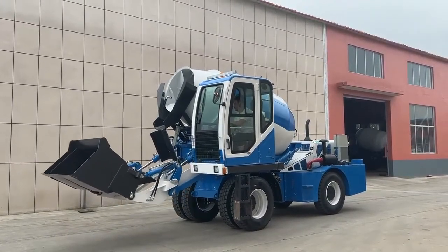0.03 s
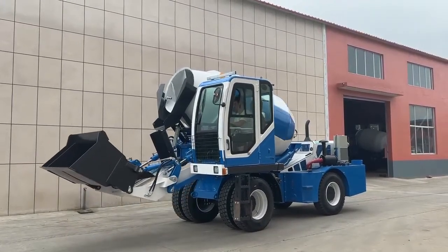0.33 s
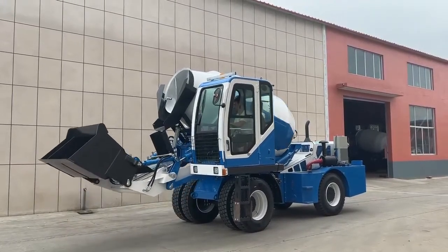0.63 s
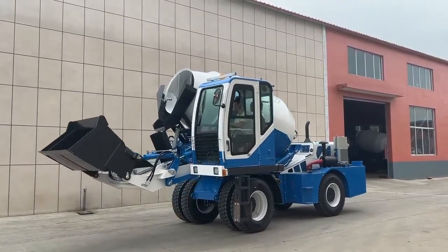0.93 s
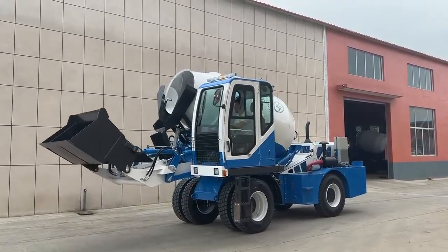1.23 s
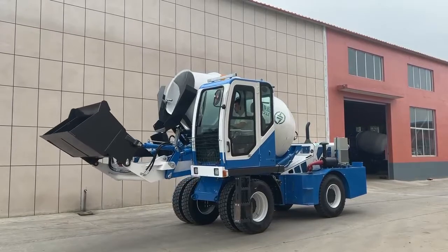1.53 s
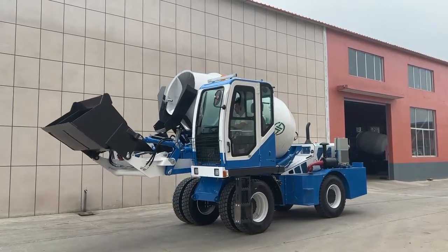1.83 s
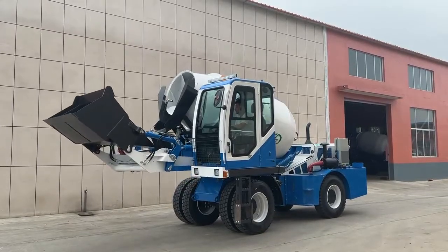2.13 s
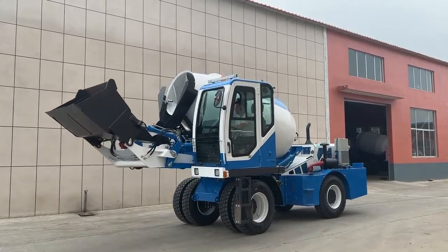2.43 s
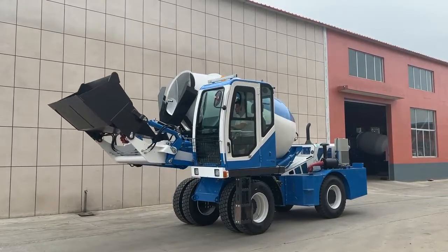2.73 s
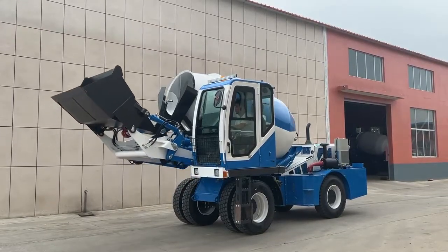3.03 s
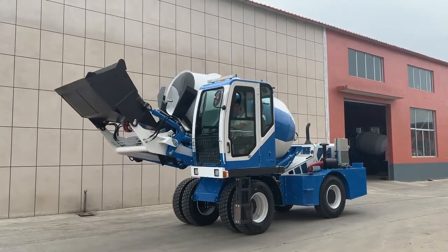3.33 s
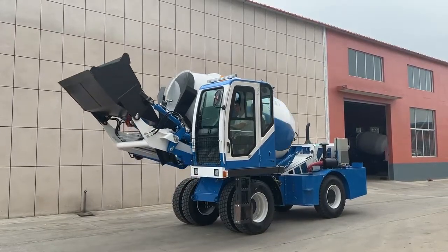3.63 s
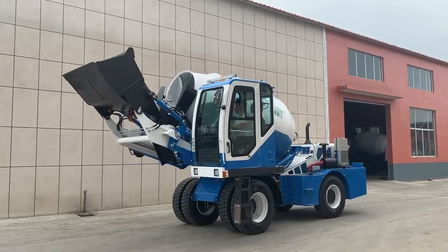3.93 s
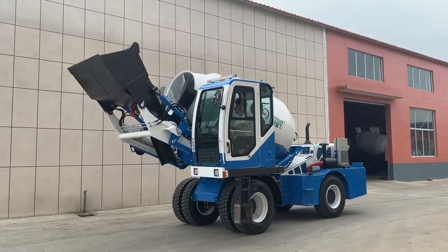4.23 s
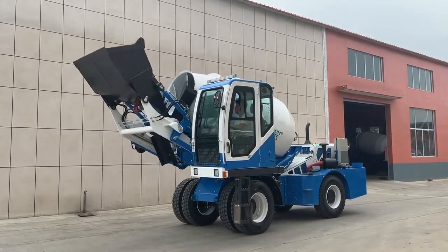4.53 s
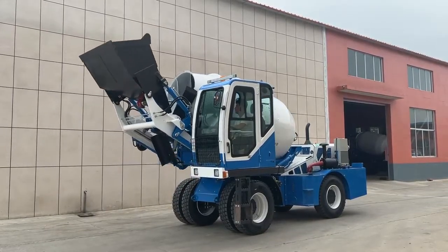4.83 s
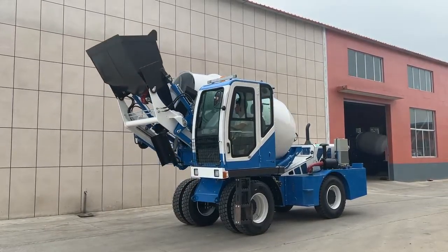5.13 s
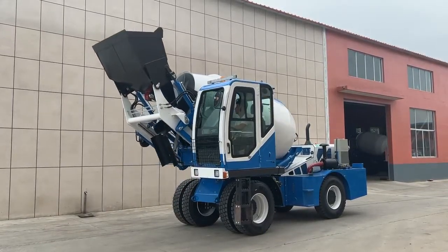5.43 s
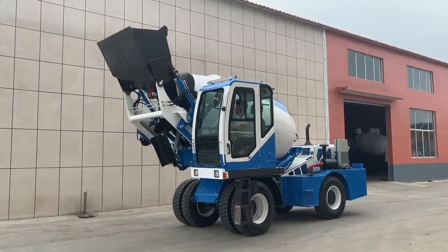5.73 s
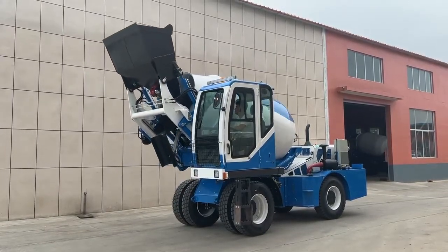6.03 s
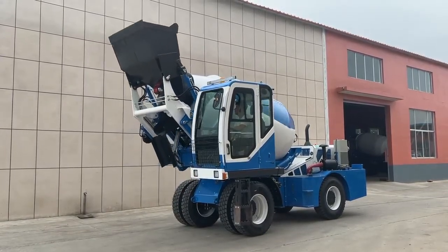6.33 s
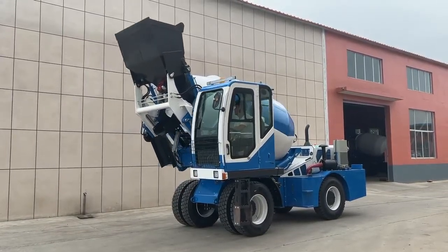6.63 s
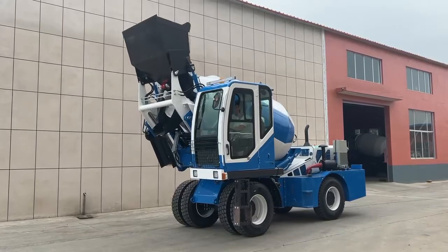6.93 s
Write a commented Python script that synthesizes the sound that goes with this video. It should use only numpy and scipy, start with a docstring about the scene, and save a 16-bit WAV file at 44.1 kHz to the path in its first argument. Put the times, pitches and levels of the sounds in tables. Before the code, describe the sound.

A concrete mixer vehicle's diesel engine runs loudly at working speed, knocking, whining and rumbling. At first a hydraulic pump hums under a buzzing hiss, then oil hisses through the valves in several surges as the bucket rises, with a few soft, dull thumps. After about five seconds the engine sinks to a slower, throbbing idle while the hiss continues. It is heard in stereo in an open paved yard.

```python
"""A self-loading concrete mixer raises its bucket in a paved yard, heard in stereo.
Its four-cylinder diesel knocks, whines and rumbles at working speed, then sinks to idle after five
seconds. Oil hisses through the valves; at first the pump hums and chops that hiss. The whole mixer
is heard directly and as a diffuse, slightly later wash that widens the stereo."""
import sys
import numpy as np
from scipy import signal
from scipy.fft import rfft, irfft
from scipy.io import wavfile

SR = 44100
rng = np.random.default_rng(int(sys.argv[2]) if len(sys.argv) > 2 else 0)


def master_out(mix):
    """Clip the mix to full scale and print it as 16-bit PCM to the path in sys.argv[1]."""
    frames = np.transpose(np.atleast_2d(mix))
    ceiling = np.clip(frames, -1, 1)
    pcm = np.round(ceiling * 32767).astype(np.int16)
    wavfile.write(sys.argv[1], SR, pcm)


N = 317079
TIME = np.arange(N) / SR
FREQS = np.fft.rfftfreq(N, 1 / SR)

# resonances of the engine block: pitch_hz, width_hz, level_db
BLOCK_MODES = [(760, 53, 7), (814, 49, -1), (867, 37, -0.5), (1046, 62, -9.5)]
# surges of oil to the bucket: start_s, rise_s, fall_s, hiss_db, jet_db
OIL_SURGES = [(1.0, 0.63, 0.45, 1, -4), (1.85, 0.44, 0.45, 2, 10.5), (2.92, 0.32, 0.38, 2.5, 10),
              (3.6, 0.27, 0.37, 1, 6), (4.15, 0.26, 0.41, .5, 8), (6.0, 0.2, 0.32, -0.5, 5.5)]


def gain_of(db):
    """Decibels to amplitude."""
    return 10 ** (np.asarray(db) / 20)

def unit_rms(x):
    """Scales x to rms 1."""
    return x / np.sqrt(np.mean(x ** 2) + 1e-20)

def over_time(rows):
    """Each column of a time table, at every sample."""
    time_s, *columns = np.transpose(rows)
    return [np.interp(TIME, time_s, column) for column in columns]

def over_frequency(points):
    """A frequency table on a log axis, at every bin."""
    hz, value = np.transpose(points)
    return np.interp(np.log(FREQS + 1), np.log(hz + 1), value)

def coloured(x, spectrum):
    """Gives x a broad colour, at rms 1."""
    return unit_rms(irfft(rfft(x) * gain_of(over_frequency(spectrum)), N))

def ring(x, modes):
    """Passes x through causal resonances whose powers add, at rms 1."""
    power = sum(gain_of(db) ** 2 / (1 + ((FREQS ** 2 - hz ** 2) / (width * FREQS + 1e-6)) ** 2)
                for hz, width, db in modes)
    cepstrum = irfft(.5 * np.log(power + 1e-10), N)
    minimum_phase = np.exp(rfft(2 * cepstrum[:N // 2], N))
    return unit_rms(irfft(rfft(x) * minimum_phase, N))

def drift(hz, size=16384):
    """A random wander of rms 1, up to about hz."""
    step_s = N / SR / size
    lowpass = np.exp(-(np.fft.rfftfreq(size, step_s) / hz) ** 2)
    slow = irfft(rfft(rng.standard_normal(size)) * lowpass)
    return np.interp(TIME, np.arange(size) * step_s, unit_rms(slow))

def swell(start_s, rise_s, hold_s, fall_s):
    """A smooth 0-1 envelope."""
    ramp = np.minimum((TIME - start_s) / rise_s, 1 + (start_s + rise_s + hold_s - TIME) / fall_s)
    return np.sin(np.pi / 2 * np.clip(ramp, 0, 1)) ** 2

def swings(rows):
    """Sums brief rises or dips: one curve in dB for each level column."""
    return sum(np.outer(levels_db, swell(start_s, rise_s, 0, fall_s))
               for start_s, rise_s, fall_s, *levels_db in rows)

def lagged(x, lag_s):
    """Follows x sluggishly."""
    keep = np.exp(-1 / (lag_s * SR))
    return x[0] + signal.lfilter([1 - keep], [1, -keep], x - x[0])

def idling(speed):
    """0 at working speed, 1 at the lowest idle."""
    return (speed.max() - speed) / np.ptp(speed)

def cyclic(turns, rough, size=4096):
    """Vibration that repeats every engine cycle, with a rough share that never does."""
    repeat = np.interp(turns % 1, np.arange(size) / size, rng.standard_normal(size))
    rough = np.clip(rough, 0, 1)
    return np.sqrt(1 - rough) * unit_rms(repeat) + np.sqrt(rough) * rng.standard_normal(N)

def tones(turns, orders, waver_db, slip_rad=0.0):
    """Wavering sines locked to the crank, give or take a slip."""
    out = np.zeros(N)
    for order, db in orders:
        peak = np.sqrt(2) * gain_of(db + waver_db * drift(4.5))
        out += peak * np.sin(2 * np.pi * (order * turns + rng.random()) + slip_rad * drift(11.4))
    return out

def yard(direct, diffuse, delay_s=.012):
    """The diffuse wash comes slightly later, with opposite signs left and right, and widens the stereo."""
    # stereo width, narrowest at coherence 1: frequency_hz, coherence
    width = [(50, .995), (400, .985), (800, .95), (1250, .5), (1550, .75), (2600, .55), (3800, .45),
             (4250, .88), (5100, .75), (5900, .4), (7300, .88), (8700, .8), (9300, .99), (10800, .99),
             (11500, .7), (12600, .98), (14000, .95), (15200, .65)]
    # stereo phase; left and right are opposite from 9 to 11 kHz: frequency_hz, left_lead_rad
    lead = [(300, 0), (800, .6), (1900, .4), (2400, 2.1), (3100, 2.7), (4150, 6.2), (5100, 6.9),
            (5450, 9.4), (5650, 8.3), (5800, 6.3), (6250, 3.1), (6750, .1), (8100, -.6), (8600, -1.4),
            (9100, -3.1), (10900, -3.15), (11400, -3.6), (11800, -4.9), (12400, -6.28), (14800, -6.5),
            (15500, -8.7)]
    # stereo balance: frequency_hz, left_minus_right_db
    balance = [(50, -1), (400, -0.5), (780, -3), (1200, 0), (2200, -4), (3500, 1), (5200, -.5), (5650, 5),
               (6300, 8.5), (7000, 2.5), (7400, 2), (9000, 0), (12000, 0)]
    side = np.array([[1], [-1]])
    coherence = over_frequency(width)
    wash = rfft(diffuse) * np.exp(-2j * np.pi * FREQS * delay_s)
    paths = np.sqrt((1 + coherence) / 2) * rfft(direct) + side * np.sqrt((1 - coherence) / 2) * wash
    placement = gain_of(side * over_frequency(balance) / 2) * np.exp(.5j * side * over_frequency(lead))
    return irfft(paths * placement, N)

def thumps():
    """Dull thumps in the machine's body swell softly and die away."""
    # thumps: start_s, pitch_hz, peak_db, swell_s
    body_thumps = [(.562, 116, -15, 0.016), (.685, 118, -14.5, 0.016), (1.121, 163, -24, 0.023),
                   (1.465, 85, -17.5, 0.016), (2.061, 121, -21, .012), (2.516, 270, -17.5, 0.0047),
                   (2.535, 120, -13.5, .016), (2.595, 214, -12, 0.0051), (2.723, 252, -17, 0.0082),
                   (2.895, 122, -21, .014), (3.04, 166, -20.5, 0.023), (3.365, 145, -20, 0.015),
                   (3.679, 159, -14.5, 0.0064), (4.48, 73, -17.5, .012), (4.689, 119, -16, 0.012),
                   (5.002, 96, -17, 0.0085), (5.085, 165, -18.5, 0.01)]
    out = np.zeros(N)
    for start_s, hz, peak_db, swell_s in body_thumps:
        age = np.maximum(TIME - start_s, 0)
        envelope = age / swell_s * np.exp(1 - age / swell_s)
        out += gain_of(peak_db) * envelope * np.sin(2 * np.pi * hz * age)
    return out

def pump_load(hold_s=1.54, release_s=.6):
    """1 while the pump labours, 0 once it runs free."""
    return np.clip(1 - (TIME - hold_s) / release_s, 0, 1)

def pump(waver_hz=2.5, waver_db=1.3, octave_db=-18, spurt_db=-30):
    """Under load the pump hums and sends one spurt of hiss down the pipes per stroke."""
    # course of the hum: time_s, pitch_hz, level_db
    hum_course = [(0, 217.4, -25), (.1, 214.5, -21), (.21, 221.6, -23.5), (.44, 214, -23.5),
                  (1.05, 215.7, -21.5), (1.45, 218, -25.5), (1.6, 222.4, -27), (1.8, 216.4, -35.5),
                  (2, 235.5, -73)]
    # resonances of the pipes: pitch_hz, width_hz, level_db
    pipe_modes = [(2710, 570, -4), (4160, 340, 2.5), (5100, 260, 4), (5720, 220, 2), (7400, 1200, -4.5)]
    hz, hum_db = over_time(hum_course)
    angle = 2 * np.pi * np.cumsum(hz + waver_hz * drift(18.7)) / SR
    hum = gain_of(hum_db + waver_db * drift(13)) * (np.sin(angle) + gain_of(octave_db) * np.sin(2 * angle))
    spurts = rng.standard_normal(N) * (1 + np.cos(angle))
    return hum + np.sqrt(pump_load()) * gain_of(spurt_db) * ring(spurts, pipe_modes)

def valve_jet(speed, flutter_db=1.8):
    """The jet in the control valve rushes in bands that slide together, sinking as it opens wide."""
    # lowest band of the jet: time_s, pitch_hz
    jet_pitch = [(0, 7480), (1.7, 7520), (2, 7380), (2.25, 7150), (2.5, 6920), (2.75, 6740), (2.95, 7150),
                 (3.25, 7400), (3.6, 7520), (4.4, 7470), (5.4, 7400), (6.2, 7180), (7.2, 7130)]
    # its bands: pitch_ratio, width_hz, level_db, open_change_db, idle_change_db, surge_share
    bands = [(1, 460, 0, -7.5, -7, .2), (1.18, 500, -15, 10.5, 3, .25), (1.44, 520, -8, 2, 2, .6),
             (1.69, 560, -7, -1.5, .5, .8), (1.9, 480, -17, 3, 3, 1), (2.16, 400, -15, 2, 0, 1)]
    # the valve's one wide opening: start_s, rise_s, hold_s, fall_s
    wide_open = (2.11, 0.2, 0.53, 0.23)
    hz, = over_time(jet_pitch)
    opening = swell(*wide_open)
    idle_flow = lagged(idling(speed), lag_s=.62)
    _, surge_db = swings(OIL_SURGES)
    jet_db = -33 - 1.5 * pump_load()
    out = np.zeros(N)
    for ratio, width_hz, db, open_db, idle_db, share in bands:
        change_db = open_db * opening + idle_db * idle_flow + share * surge_db + flutter_db * drift(23)
        angle = 2 * np.pi * np.cumsum(ratio * hz) / SR
        rush = drift(width_hz) * np.cos(angle) + drift(width_hz) * np.sin(angle)
        out += gain_of(jet_db + db + change_db) * rush
    return out

def oil(speed, ease_db_per_s=-.5):
    """Oil hisses in the valves and pipes, and surges with a sharp rush as it lifts the bucket."""
    # resonances of the valves: pitch_hz, width_hz, level_db
    valve_modes = [(3577, 290, -1.5), (4177, 73, -2.5), (5160, 310, -5), (5610, 110, 1.5), (6330, 165, 1),
                   (7410, 920, -5), (8250, 89, -5)]
    # broad hiss of the oil: frequency_hz, level_db
    hiss_spectrum = [(1200, -.5), (2500, 0), (3300, 2.5), (5000, 3), (7000, 0), (8500, 4.5), (10000, 4.5),
                     (13000, 2), (14000, -3), (15200, 0), (16000, -5)]
    # sharp rush of the lift: frequency_hz, level_db
    lift_spectrum = [(3800, -30), (4500, -8.5), (4750, 3), (4950, 4), (5150, 5), (5450, -26), (6500, -47)]
    surge_db, _ = swings(OIL_SURGES)
    hiss_db = -26 + ease_db_per_s * TIME + surge_db
    valve_noise, wash_noise, lift_noise = rng.standard_normal((3, N))
    valves = gain_of(hiss_db - 3.7 + .7 * drift(40)) * ring(valve_noise, valve_modes)
    wash = gain_of(hiss_db - 4.5) * coloured(wash_noise, hiss_spectrum)
    lift = gain_of(-36.5 + 2 * surge_db + 1.3 * drift(25)) * coloured(lift_noise, lift_spectrum)
    return valves + wash + lift + valve_jet(speed)

def exhaust(turns, speed, take_up_s=.2, ease_db_per_s=-.74):
    """Four puffs of gas a cycle roar with the load; the boom and rumble beneath swell at idle."""
    # the engine pulls harder: start_s, rise_s, fall_s, change_db
    pulls = [(.2, 0.14, 1, 2), (1.2, 0.33, 0.33, 2), (2.42, 0.22, 0.62, 1.5), (2.9, 0.69, 1, 0.5),
             (4.4, 0.83, 1.7, 2)]
    # colour of the gas: frequency_hz, level_db
    gas_spectrum = [(15, -66), (30, -41), (60, -11), (100, 1), (130, 0), (175, -0.5), (260, -2), (300, -4),
                    (350, -4), (420, -7), (480, -10), (590, -14), (900, -9), (2000, -37)]
    # exhaust tones: cycle_multiple, level_db
    gas_orders = [(4, -31), (6, -19.5), (10, -17.5), (12, -13), (16, -11.5), (24, -16), (32, -20)]
    # boom tones: cycle_multiple, level_db
    boom_orders = [(8, -32.5), (16, -45.5)]
    # deep rumble: frequency_hz, level_db
    rumble_spectrum = [(10, -56), (25, -44), (38, -19), (52, 1.5), (70, -5.5), (110, -5.5), (200, -34),
                       (340, -8), (500, -30.5), (1500, -56)]
    idle = lagged(idling(speed), lag_s=.26)
    unloaded = np.maximum(1 - TIME / take_up_s, 0)
    pull_db, = swings(pulls)
    roar_db = -22 - 3.5 * unloaded + ease_db_per_s * TIME - 5 * idle + pull_db
    puffs = cyclic(turns, rough=.898) * (1 + .2 * np.cos(2 * np.pi * 4 * turns))
    gas = gain_of(-1.2) * coloured(puffs, gas_spectrum) + tones(turns, gas_orders, waver_db=3)
    boom = tones(turns, boom_orders, waver_db=.4)
    rumble = gain_of(-32) * coloured(rng.standard_normal(N), rumble_spectrum)
    return gain_of(roar_db) * gas + gain_of(1.5 * idle) * (boom + rumble)

def crank(cycle_zero_s=2.385, wander=.0008):
    """Count and rate of the four-stroke cycles; the governor lets the count wander a little."""
    # engine speed: time_s, cycle_rate_hz
    speed_course = [(0, 9.3), (.25, 9.65), (.55, 10.06), (.8, 10.24), (1.1, 10.31), (2, 10.33),
                    (2.4, 10.36), (5.05, 10.37), (5.25, 8.6), (5.5, 7), (5.75, 7.22), (6.1, 7.17),
                    (7.2, 7.15)]
    speed, = over_time(speed_course)
    turns = np.cumsum(speed * (1 + wander * drift(6))) / SR
    return turns - np.interp(cycle_zero_s, TIME, turns), speed

def governor(speed, ease_db_per_s=-.1141):
    """Knock and clatter levels duck as the fuel is cut, then jump as a burst catches the engine."""
    # fuel cuts and burst: start_s, onset_s, recovery_s, knock_change_db
    fuel_changes = [(5.02, 0.13, 0.069, -6.5), (5.26, 0.22, 0.12, -13), (5.62, 0.061, 0.054, 4.5)]
    fuel_db, = swings(fuel_changes)
    knock_db = -27.5 + .2 * idling(speed) + fuel_db
    clatter_db = -29 - 1.3 * idling(speed) + ease_db_per_s * TIME + .34 * fuel_db
    return knock_db, clatter_db

def block_drone(turns, speed, waver_hz=28, waver_db=2):
    """At idle the block keeps ringing in its lowest mode, throbbing twice a cycle."""
    knock_db, _ = governor(speed)
    angle = 2 * np.pi * np.cumsum(BLOCK_MODES[0][0] + waver_hz * drift(60.6)) / SR
    throb = 1 + .3 * np.cos(4 * np.pi * turns)
    peak = np.sqrt(2) * gain_of(knock_db - 8 + waver_db * drift(30))
    return idling(speed) * throb * peak * np.sin(angle)

def blows(turns, loose_s=.00027, vary_db=1.7, cycle_count=80):
    """One click for each firing and valve blow, a little loose in time and strength."""
    # blows within one cycle: cycle_fraction, level_db
    knocks = [(0.099, -1.5), (0.161, -5), (0.392, 1), (.63, -1), (0.71, -13), (0.808, -2.5), (0.898, -6.5),
              (.96, 1.5)]
    force = np.zeros(N)
    cycles = np.floor(turns[0]) + np.arange(cycle_count)
    for place, db in knocks:
        late, strong = rng.standard_normal((cycle_count, 2)).T
        due_s = np.interp(cycles + place, turns, TIME, left=-1, right=-1)
        at = np.round((due_s + loose_s * late) * SR).astype(int)
        heard = (at >= 0) & (at < N)
        force[at[heard]] += gain_of(db + vary_db * strong[heard])
    return force

def engine(turns, speed, force, rattle_s=.0033, settle_start_s=1.42, settle_s=.99):
    """Knocks and gear teeth ring the block, the covers shake, the fan rushes; gears and fan fade at idle."""
    # whine of the gear teeth: cycle_multiple, level_db
    gear_orders = [(60, -4), (61, -2), (67, 2.5), (71, -3.5), (73, -.5), (75, -10), (77, -6), (79, -7),
                   (80, -4), (81, -5), (84, -3), (88, -2.5), (104, -5), (106, -3), (108, -5), (110, -5)]
    # resonances of the covers: pitch_hz, width_hz, level_db
    cover_modes = [(1301, 31, 0.5), (1438, 62, 2.5), (1610, 54, 2), (1928, 60, 0.5), (2080, 60, 2),
                   (2570, 450, -14.5), (2686, 200, 0), (2843, 21, 8)]
    # singing of the covers: cycle_multiple, level_db
    cover_orders = [(120, -20), (136, -8.5), (141, -32), (149, -20)]
    # rush of the fan: frequency_hz, level_db
    fan_spectrum = [(150, 7), (350, -6), (480, 2.5), (600, 2.5), (950, 2.5), (1150, -3), (1500, 3.5),
                    (1780, -4.5), (2100, 0), (3100, -3.5), (4500, -19), (9000, -51)]
    knock_db, clatter_db = governor(speed)
    pace, idle = speed / speed.max(), idling(speed)
    # the whine starts rough, with more block and less gear, then settles
    unsettled = np.clip(1 - (TIME - settle_start_s) / settle_s, 0, 1)
    shake = unit_rms(signal.lfilter([1], [1, -np.exp(-1 / (rattle_s * SR))], force))
    rattle = unit_rms(cyclic(turns, rough=.37 + .63 * idle) * (1.4 + shake))
    knocking = unit_rms(force) + gain_of(6.5) * rattle
    block = gain_of(knock_db - 7 + 3 * idle + 4 * unsettled) * ring(knocking, BLOCK_MODES)
    teeth = tones(turns, gear_orders, waver_db=.5, slip_rad=.12)
    gears = gain_of(knock_db - 1 - 2 * unsettled) * pace ** 2.1 * ring(teeth, BLOCK_MODES)
    gears *= 1 + .25 * np.cos(2 * np.pi * turns)  # uneven pull of the cylinders
    covers = gain_of(clatter_db - 4) * ring(cyclic(turns, rough=.69) * (1.8 + shake), cover_modes)
    singing = gain_of(knock_db - 12.5) * pace ** 12 * tones(turns, cover_orders, waver_db=3.5)
    fan = gain_of(clatter_db - 1.5) * pace ** 2.1 * coloured(cyclic(turns, rough=.67), fan_spectrum)
    return block + gears + covers + singing + fan

def mixer(turns, speed, force):
    """The whole machine: diesel, body and hydraulics."""
    diesel = engine(turns, speed, force) + block_drone(turns, speed) + exhaust(turns, speed)
    return diesel + thumps() + pump() + oil(speed)

def scene():
    """The whole mixer, heard directly and, with fresh noise, as a diffuse wash that widens the stereo."""
    turns, speed = crank()
    force = blows(turns)
    return yard(direct=mixer(turns, speed, force), diffuse=mixer(turns, speed, force))

def record(dry):
    """The recorder passes both channels up to 15.7 kHz."""
    lowpass = signal.firwin(511, 15700, window=("kaiser", 9), fs=SR)
    return signal.oaconvolve(dry, lowpass[None], "same")


dry = scene()
out = record(dry)
master_out(out)
```